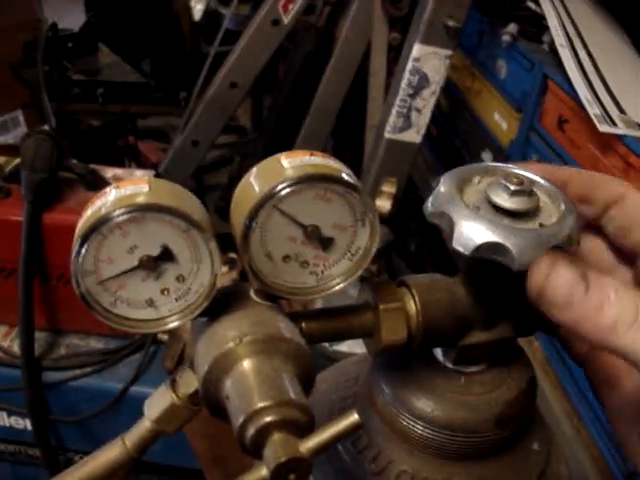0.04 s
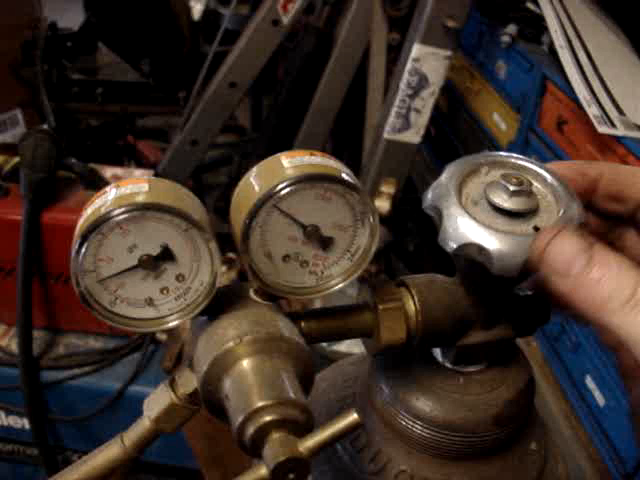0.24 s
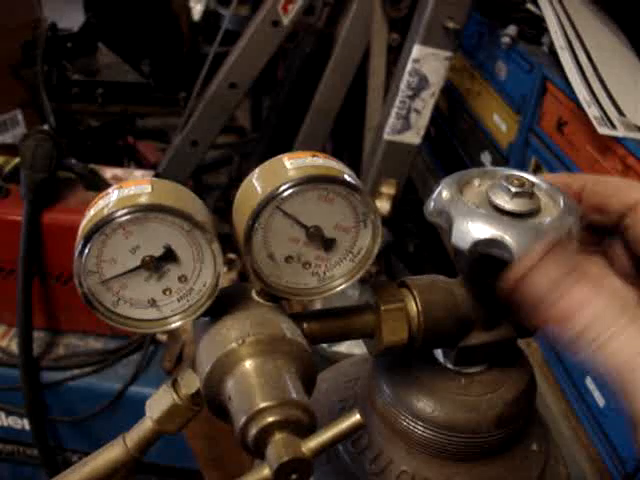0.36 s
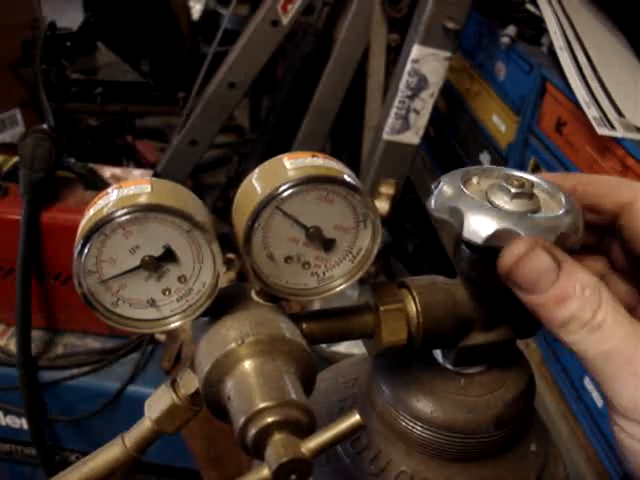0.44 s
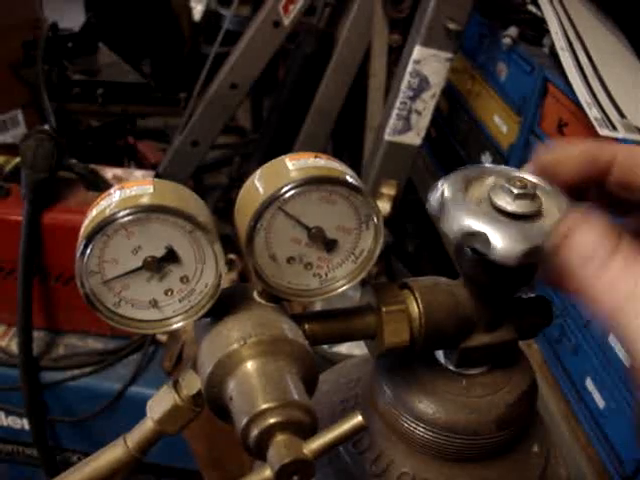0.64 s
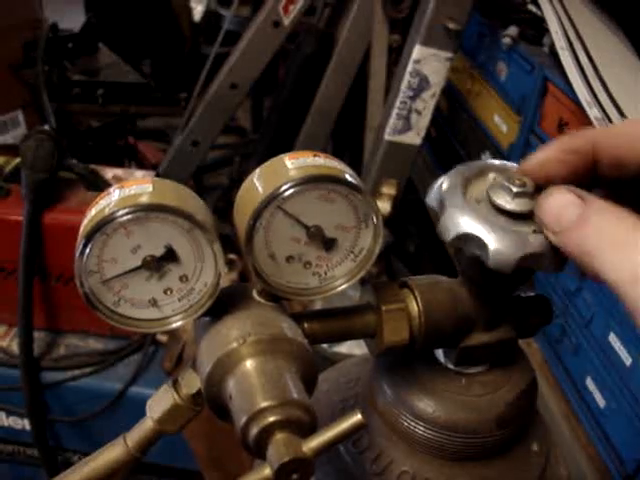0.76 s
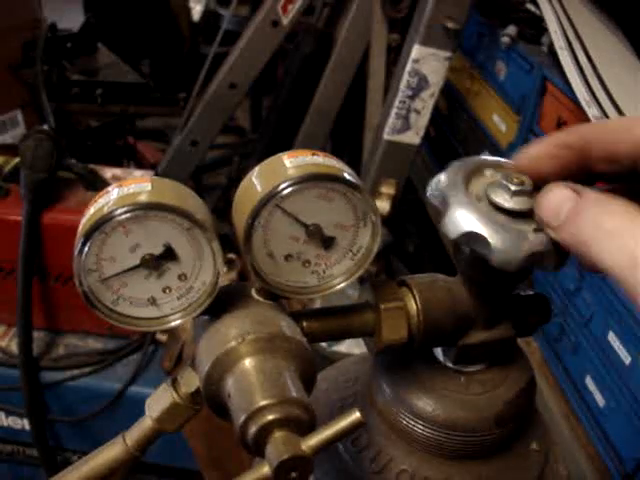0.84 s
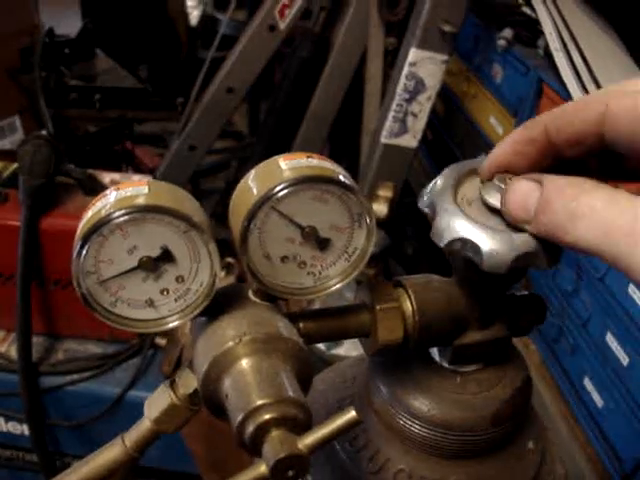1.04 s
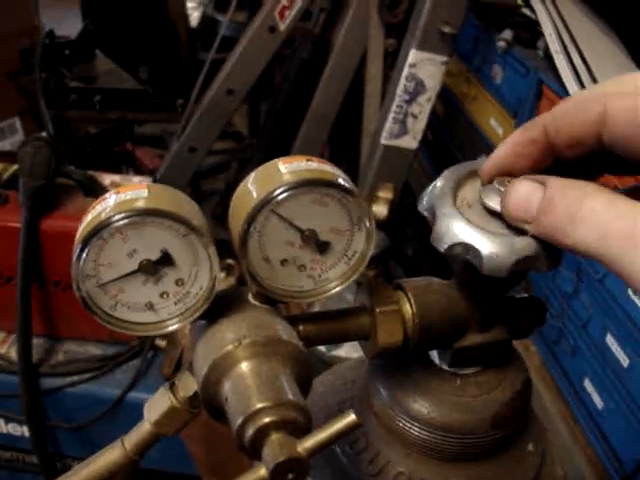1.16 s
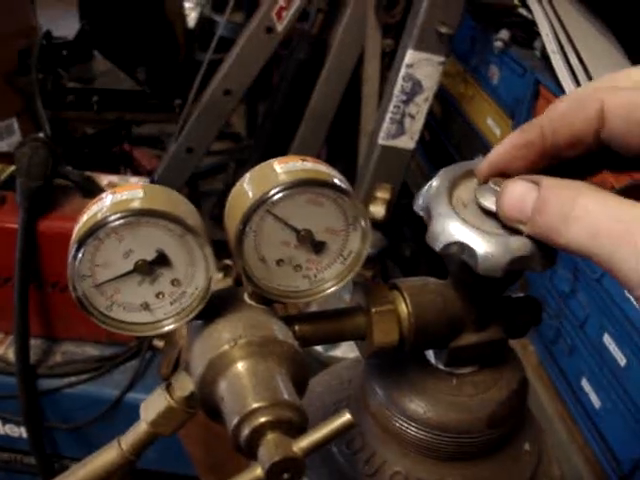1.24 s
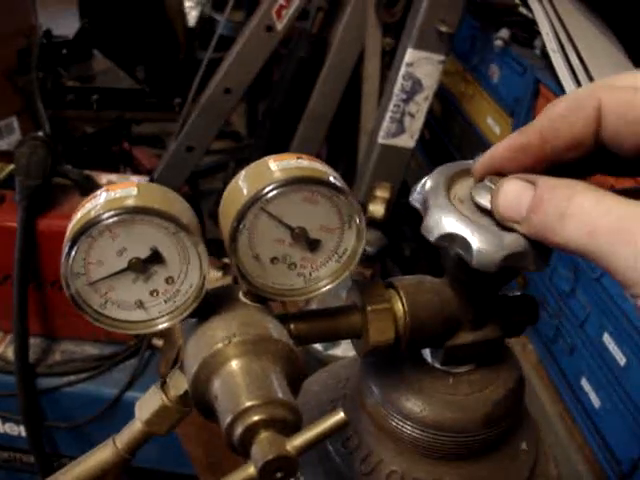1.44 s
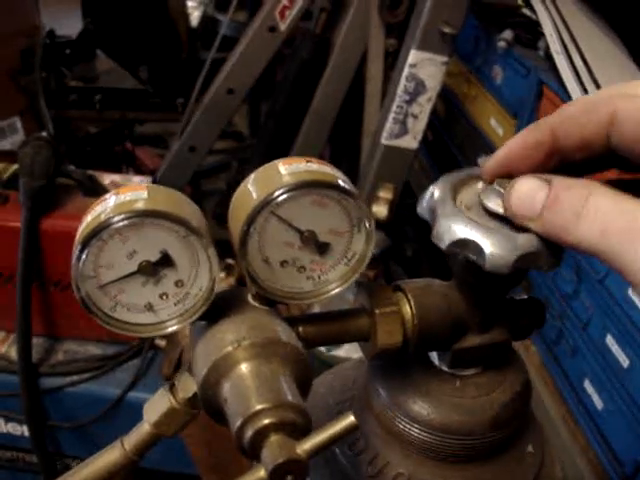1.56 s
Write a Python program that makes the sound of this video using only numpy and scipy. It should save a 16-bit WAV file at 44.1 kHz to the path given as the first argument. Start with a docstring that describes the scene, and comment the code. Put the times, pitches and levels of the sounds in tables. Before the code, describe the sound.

A loose metal valve handwheel rattles close by on a gas cylinder. From about 0.2 seconds it clacks in quick, uneven clusters, each ringing briefly. Around 0.7 seconds it snaps hard twice with a low thump and a short scrape. Softer clinks follow until 1.1 seconds, then faint ticks and dull finger bumps at the nut until 1.5 seconds, over quiet workshop air and a faint hum.

```python
"""A quiet workshop, one microphone close to the valve of a gas cylinder. A loose metal handwheel is rocked on
the stem: each knock clacks and rings the wheel, its washer, the valve body and the cylinder. Twice the wheel
snaps hard against the stem, a low swing settling after each, and scrapes along it, then fingers fiddle with the
nut. Further off, the small room answers over still air and a low mains hum."""
import sys
import numpy as np
from scipy import signal
from scipy.fft import rfft, irfft
from scipy.io import wavfile

SR = 44100
rng = np.random.default_rng(int(sys.argv[2]) if len(sys.argv) > 2 else 0)


def transcribe(signal):
    """Save signal, clipped to [-1, 1], as a 16-bit WAV file at the path in sys.argv[1]."""
    frames = np.atleast_2d(signal).T
    limited = np.clip(frames, -1, 1)
    pcm = np.round(limited * 32767).astype(np.int16)
    wavfile.write(sys.argv[1], SR, pcm)


N = 70560

# spectrum of metal touching metal, in clacks and scrapes: f/Hz, level/dB
CONTACT_COLOUR = [(100, -17.5), (400, 4.5), (1000, 7.5), (3400, 3), (4500, 3), (4850, -2), (5600, 1.5),
                  (6400, -8), (7100, -8), (8700, -12), (9450, -3.5)]


def amp(db):
    return 10 ** (np.asarray(db) / 20)


def unit(x):
    """Scales to energy 1."""
    return x / np.sqrt(np.sum(x ** 2) + 1e-20)


def read(points, hz):
    """Reads a table on a log-frequency axis."""
    f, value = np.transpose(points)
    return np.interp(np.log(hz + 1), np.log(f + 1), value)


def add(mix, s, sound):
    part = mix[max(round(s * SR), 0):][:len(sound)]
    part += sound[:len(part)]


def pulse(gain_db, size=2048):
    """Causal pulse of energy 1 whose spectrum has the shape gain_db(Hz)."""
    log_gain = np.log(amp(gain_db(abs(np.fft.fftfreq(size, 1 / SR)))))
    minimum_phase = np.exp(np.conj(signal.hilbert(log_gain)))
    return unit(np.fft.ifft(minimum_phase).real[:size // 2])


def hump(hz, centre_hz, octaves, skirt_db):
    """A broad spectral hump in dB."""
    bell = np.exp(-.5 * (np.log2((hz + 1) / centre_hz) / octaves) ** 2)
    return 20 * np.log10(bell + amp(skirt_db))


def decay(t, t60):
    return np.exp(-np.log(1000) * t / t60)


def room_tone(hum_hz=120.3):
    """Air all around the microphone, a little louder at first, and a faint mains hum."""
    # spectrum of the air: f/Hz, relative level/dB
    air_colour = [(15, -38.5), (25, -0.5), (186, 0), (667, -15), (972, -10.5), (1190, -15.5), (1380, -5),
                  (1560, -16.5), (1770, -16.5), (2520, -22.5), (2720, -23), (4370, -21.5), (10000, -30.5),
                  (13000, -66), (22000, -120)]
    # drift of its loudness: t/s, relative level/dB
    air_drift = [(0, 9.5), (.18, 3), (1.1, 1), (1.3, 2), (1.6, 1)]
    t = np.arange(N) / SR
    spectrum = rfft(rng.standard_normal(N)) * amp(read(air_colour, np.fft.rfftfreq(N, 1 / SR)))
    air = unit(irfft(spectrum, N)) * np.sqrt(N)
    air_db = -53.5 + np.interp(t, *np.transpose(air_drift))
    hum = np.sqrt(2) * np.sin(2 * np.pi * (hum_hz * t + rng.random()))
    return amp(air_db) * air + amp(-59) * hum


def fingers():
    """Dull bumps of the hand on the wheel."""
    # soft bumps: t/s, level/dB, centre f/Hz
    bumps = [(.004, -44, 220), (0.963, -33.5, 343), (1.208, -43, 450), (1.272, -48, 234), (1.527, -35, 230)]
    out, t = np.zeros(N), np.arange(SR // 8) / SR
    for s, db, centre_hz in bumps:
        thud = pulse(lambda hz: hump(hz, centre_hz, 0.71, skirt_db=-28.5))
        force = rng.standard_normal(len(t)) * decay(t, t60=0.012)
        add(out, s, amp(db) * signal.fftconvolve(force, thud))
    return out


def workshop(x, delay_s=.005, change_hz=1.688):
    """Diffuse reflections, each band dying at its own speed; their pattern slowly shifts."""
    # reverberation time of the room: f/Hz, t60/s
    room_t60 = [(200, 4), (420, 1.04), (700, .5), (1400, 0.55), (3000, 1.22), (6000, 1.2), (10000, 5.5)]
    # colour of the reflections: f/Hz, level/dB
    room_colour = [(200, -7.5), (500, 3), (900, -2), (1500, -0.5), (3000, -19.5), (4500, -9.5), (5300, -6),
                   (6300, -4), (10000, -15)]
    out, turn = np.zeros(N), 2 * np.pi * change_hz * np.arange(N) / SR
    for weight in (np.cos(turn), np.sin(turn)):
        hz, t, bands = signal.stft(rng.standard_normal(SR), SR, nperseg=256)
        t60 = read(room_t60, hz)[:, None]
        equal_energy = np.sqrt(2 * np.log(1000) / (t60 * SR))
        bands = bands * decay(t, t60) * equal_energy * amp(read(room_colour, hz))[:, None]
        response = signal.istft(bands, SR, nperseg=256)[1]
        add(out, delay_s, signal.fftconvolve(x * weight, response))
    return out


def clack(centre_hz, octaves, clatter_db, gap_s=.0006):
    """Metal meets metal: one sharp contact, then a brief dense clatter."""
    t = np.arange(SR // 8) / SR
    clatter = rng.standard_normal(len(t)) * decay(t, t60=0.044) * (t > gap_s)
    force = (t == 0) + amp(clatter_db) * unit(clatter)
    contact = pulse(lambda hz: read(CONTACT_COLOUR, hz) + hump(hz, centre_hz, octaves, skirt_db=-12.5))
    return signal.fftconvolve(force, contact)


def ring(modes, rise_s, ring_db, free_s, damped_db):
    """One blow on a part: it rings freely, then settles against its seat and is damped."""
    waver_hz, waver_step_s = 12.8, .012  # the shifting seat bends the pitch of each mode
    detune, strike_spread_db = 0.0048, 1.5
    out, t = 0, np.arange(SR // 3) / SR
    for hz, db, t60 in modes:
        waver = waver_hz * np.interp(t / waver_step_s, np.arange(64), rng.standard_normal(64))
        pitch_hz = hz * (1 + detune * rng.uniform(-0.7, 1)) + waver
        turns = np.cumsum(pitch_hz) / SR + rng.random()
        strength = amp(db + strike_spread_db * rng.uniform(-0.91, 1))
        out = out + strength * decay(t, t60) * np.sin(2 * np.pi * turns)
    seated = np.clip(t / free_s - 1, 0, .5) * 2
    return amp(ring_db + damped_db * seated) * out * (1 - np.exp(-t / rise_s))


def handwheel():
    """Knocks clack and ring four parts, ticks only clack; returns the close sound and the room's feed."""
    # wheel knocking on the stem, and near 0.78 s the washer squealing: t/s, clack level/dB, # centre f/Hz,
    # width/octaves, clatter against the contact/dB, then level/dB of valve body, wheel, # washer and cylinder
    knocks = [(0.2003, -28.5, 1500, 1, 8.5, -33.5, -27, -62, -38.5),
              (.2366, -6.5, 2640, 0.65, 1.5, -39, -15.5, -23, -41),
              (0.2404, -13, 2250, 0.27, -2, -29.5, -39, -44, -45),
              (.2527, -16.5, 3230, 0.37, 4.5, -29, -21.5, -24, -34.5),
              (0.256, -5, 3100, 0.29, -4, -26.5, -34, -26, -34.5),
              (0.3663, -23, 2980, 0.33, -0.5, -36.5, -49, -37, -50),
              (.398, -15, 3280, .6, 3, -24.5, -21, -19.5, -22.5),
              (.5205, -12.5, 4570, 1.96, 4.5, -27, -35, -25, -34),
              (0.523, -16, 2000, 2.1, 5, -18.5, -6.5, -21, -23),
              (0.5426, -11, 3060, 0.25, -1.5, -15.5, -32, -28, -22.5),
              (0.6638, -19, 2610, 0.27, -2, -52, -45, -47, -56),
              (0.6673, -7.5, 3040, 0.44, 0.5, -37, -46, -27, -30),
              (.672, -14.5, 3700, 0.24, 8, -40, -36, -29.5, -29.5),
              (.679, -11, 2390, 0.41, 0.5, -27.5, -24.5, -24.5, -26),
              (0.7759, -19.5, 4000, 1.1, 8.5, -50, -25, -8, -23),
              (0.785, -28.5, 1140, 0.18, 6, -42, -35, -14, -25),
              (.817, -28.5, 6040, 0.63, 2.5, -56, -34, -24.5, -59),
              (.8858, -19, 3603, 0.21, 1, -35, -39, -42, -45),
              (.962, -21, 1800, 0.68, 6.5, -34.5, -31.5, -27.5, -31),
              (1.0529, -28, 3200, 1.07, 3.5, -49, -26, -26.5, -36.5)]
    # light ticks muffled by the fingers: t/s, level/dB, centre f/Hz, width/octaves, clatter/dB
    ticks = [(.735, -31, 3300, .25, 0), (1.119, -32, 1360, .5, 0.5), (1.2115, -32, 1800, 0.51, -1.5),
             (1.3784, -31.5, 1720, 0.55, 1), (1.389, -34.5, 1650, 0.49, 3.5), (1.501, -37, 3600, .35, 1),
             (1.52, -42, 3900, 0.68, 6)]
    # modes of the four parts: f/Hz, relative level/dB, t60/s
    body_modes = [(464.6, -19, 0.15), (560, -10, 0.11), (620.4, -5.5, 0.25), (694, 1, .12), (804, -5, .1),
                  (877, -2.5, 0.073), (946, 3, 0.064)]
    washer_modes = [(6136, -0.5, 0.066), (6430, -22, 0.023), (6338, 0, 0.071), (6406, 0, 0.052),
                    (9150, -23, 0.044)]  # small, under the nut
    wheel_modes = [(1117, -7, 0.15), (1332.4, 3.5, 0.18), (1800, -12, 0.37), (1832, -21, 0.19),
                   (2090, -16, 0.24), (2255, -15, 0.16), (2380, -10, .12), (2640, -37, 0.13),
                   (2780, -15.5, 0.4), (3130, -17, 0.14), (3900, -15, 0.065), (3640, -17, 0.071),
                   (4435, 1.5, 0.049)]
    cylinder_modes = [(1049, -2.5, 0.33), (1129, 2, 0.32), (1195, -3.5, .28), (1508, -3, 0.37),
                      (1578, -8, 0.41), (1690, -9, 0.43), (1767, -3, 0.48), (4560, -4.5, 0.38)]  # the steel rings on longer
    clacks, body, washer, wheel, cylinder = np.zeros((5, N))
    for s, db, centre_hz, octaves, clatter_db, body_db, wheel_db, washer_db, cylinder_db in knocks:
        add(clacks, s, amp(db + 6.5) * clack(centre_hz, octaves, clatter_db))
        add(body, s, amp(body_db) * ring(body_modes, 0.0053, -10.5, free_s=0.031, damped_db=-4.5))
        add(washer, s, amp(washer_db) * ring(washer_modes, 0.0013, -12, free_s=0.01, damped_db=-32.5))
        add(wheel, s, amp(wheel_db) * ring(wheel_modes, 0.0043, -13.5, free_s=0.015, damped_db=-13.5))
        add(cylinder, s,
            amp(cylinder_db) * ring(cylinder_modes, 0.0069, -17, free_s=0.023, damped_db=-3.5))
    for s, db, centre_hz, octaves, clatter_db in ticks:
        add(clacks, s, amp(db + 6) * clack(centre_hz, octaves, clatter_db))
    close = clacks + body + washer + wheel + cylinder
    to_room = clacks + amp(-6) * body + amp(-16) * washer + amp(-8) * wheel + amp(1) * cylinder
    return close, to_room


def snaps(echo_s=.0092, echo_hz=2300):
    """Single hard contacts with a trace of grit, thrown back once, duller, by a surface close by."""
    # one light snap, then two hard ones: t/s, relative level/dB, centre f/Hz, width/octaves
    contacts = [(0.4607, -17.5, 8000, 2), (.713, 4, 2190, 1.15), (0.7483, -2, 2300, 0.87)]
    # spectrum of a snap: f/Hz, level/dB
    colour = [(300, 13), (1500, -1), (3500, 0.5), (5500, -9.5), (8500, 4)]
    out, t = np.zeros(N), np.arange(SR // 16) / SR
    surface = pulse(lambda hz: hump(hz, echo_hz, 0.55, skirt_db=-34))
    surface /= abs(rfft(surface)).max()
    for s, db, centre_hz, octaves in contacts:
        grit = amp(-13.5) * unit(rng.standard_normal(len(t)) * decay(t, t60=0.023))
        contact = pulse(lambda hz: hump(hz, centre_hz, octaves, skirt_db=-49) + read(colour, hz))
        snap = signal.fftconvolve((t == 0) + grit, contact)
        add(out, s, amp(db + 5.5) * snap)
        add(out, s + echo_s, amp(db - 12) * signal.fftconvolve(snap, surface))
    return out


def scrapes(centre_hz=4280, slips_per_s=900, spread_db=6):
    """Sliding metal catches and slips: a swell of tiny bright clicks."""
    # the wheel slides on the stem: t/s, length/s, level/dB
    slides = [(0.691, 0.035, -53), (0.754, 0.065, -43.5), (.8, 0.087, -50.5)]
    t = np.arange(N) / SR
    slips = (rng.random(N) < slips_per_s / SR) * rng.choice([-1, 1], N)
    slips = slips * amp(spread_db * rng.standard_normal(N))
    swell = sum(amp(db) * np.sin(np.pi * np.clip((t - s) / length, 0, 1)) for s, length, db in slides)
    grain = pulse(lambda hz: read(CONTACT_COLOUR, hz) + hump(hz, centre_hz, 0.58, skirt_db=-19.5))
    return signal.fftconvolve(swell * unit(slips) * np.sqrt(N), grain)[:N]


def jolts(decay_s=0.034, swing=1.07):
    """Each hard snap is followed by a low swing that overshoots and settles."""
    # low swings: t/s, level/dB
    swings = [(0.713, -20), (0.7494, -29)]
    out, age = np.zeros(N), np.arange(SR // 2) / SR / decay_s
    for s, db in swings:
        add(out, s, amp(db) * (1 - swing * age) * np.exp(-age))
    return out


def scene():
    """At the microphone, in mono: metal and fingers up close, the workshop behind them."""
    metal, metal_to_room = handwheel()
    snap = snaps()
    handling = fingers() + scrapes()
    room = workshop(metal_to_room + handling + amp(-12.5) * snap)
    return (metal + snap + handling + room + jolts() + room_tone())[None]


def record(dry):
    """The recorder rounds the highest peaks and limits the band."""
    peak_limit, edge_hz = .8, 9980
    rounded = np.tanh(dry / peak_limit) * peak_limit
    lowpass = signal.firwin(401, edge_hz, window=("kaiser", 8), fs=SR)
    return signal.oaconvolve(rounded, lowpass[None], "same")


dry = scene()
out = record(dry)
transcribe(out)
```